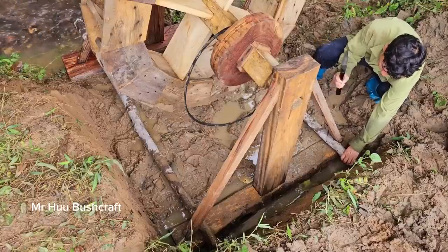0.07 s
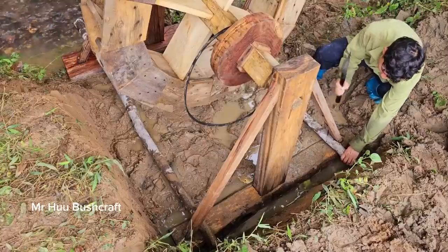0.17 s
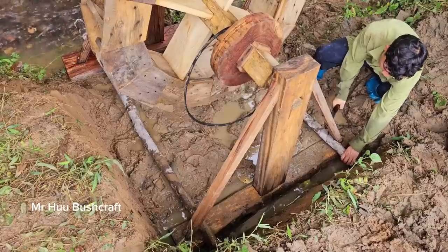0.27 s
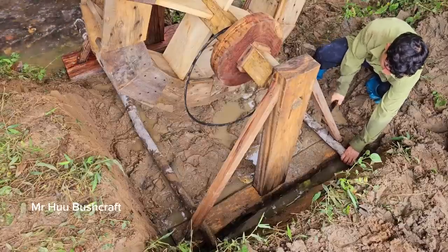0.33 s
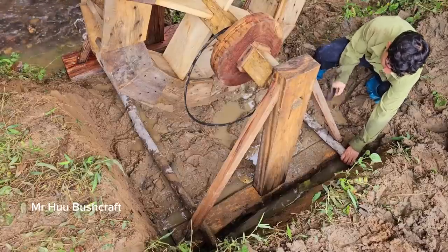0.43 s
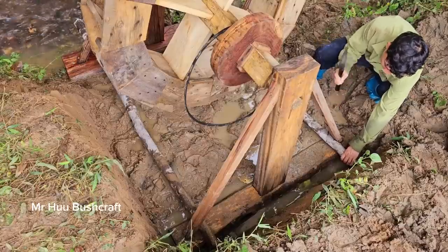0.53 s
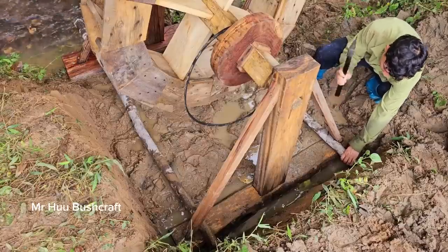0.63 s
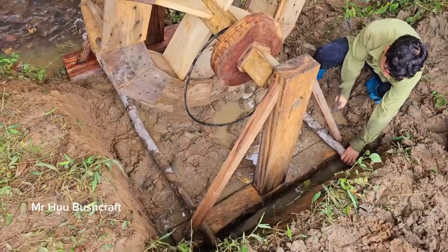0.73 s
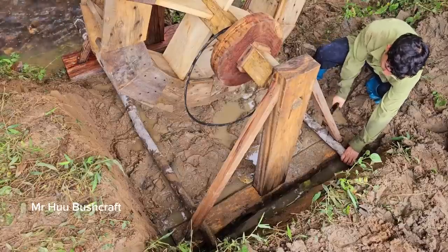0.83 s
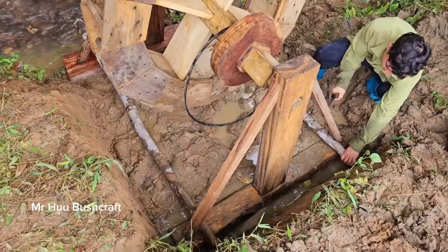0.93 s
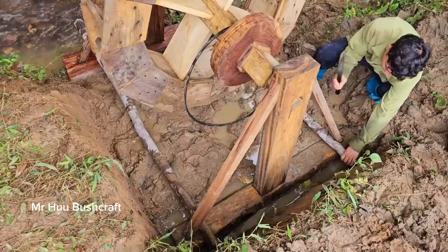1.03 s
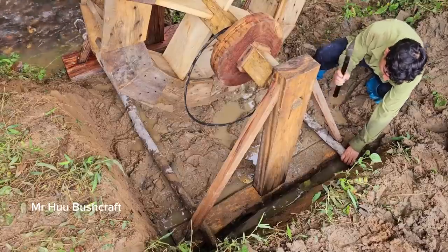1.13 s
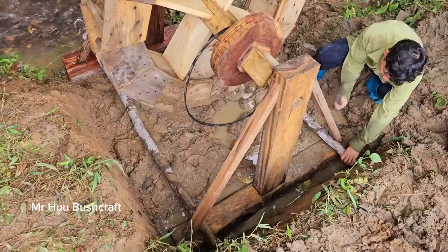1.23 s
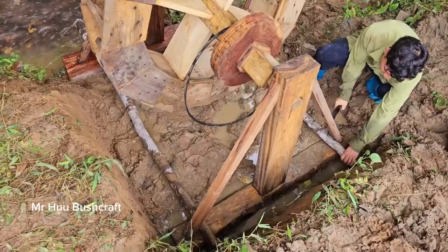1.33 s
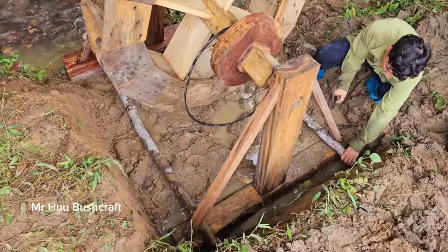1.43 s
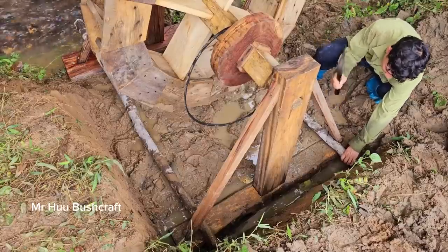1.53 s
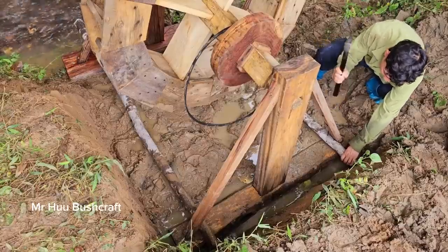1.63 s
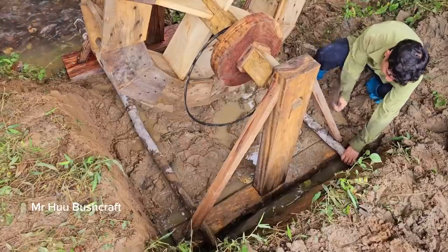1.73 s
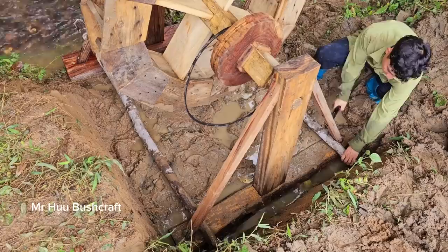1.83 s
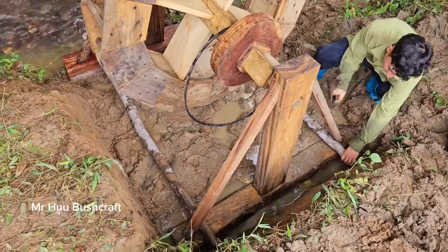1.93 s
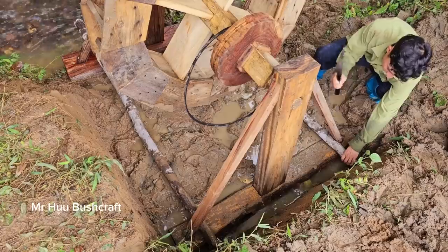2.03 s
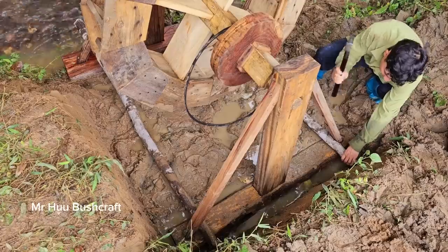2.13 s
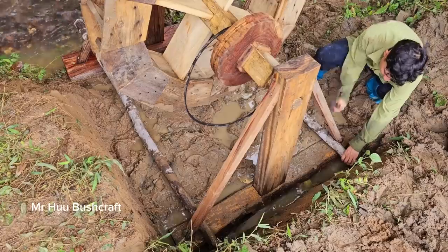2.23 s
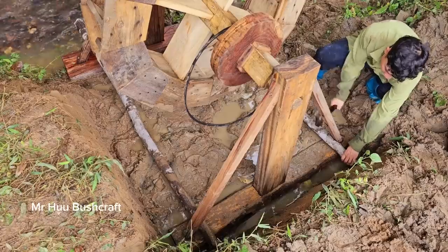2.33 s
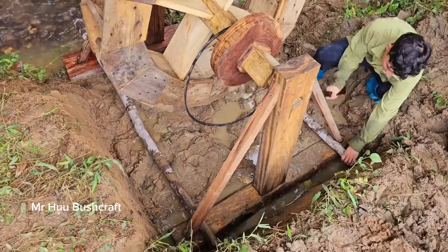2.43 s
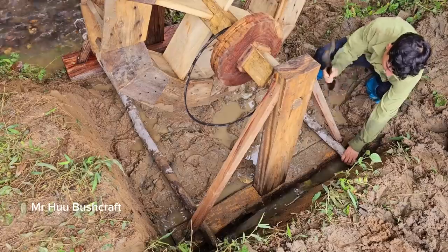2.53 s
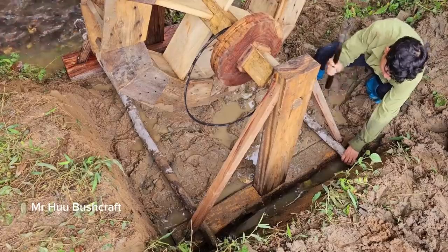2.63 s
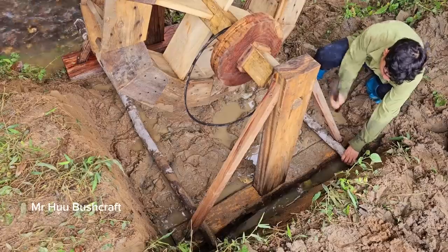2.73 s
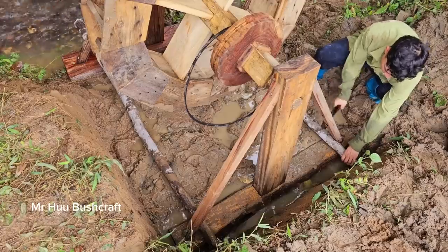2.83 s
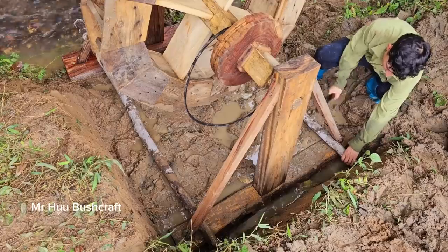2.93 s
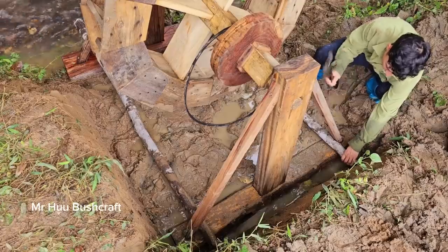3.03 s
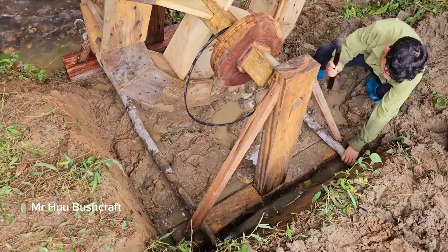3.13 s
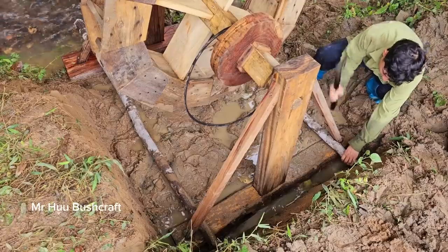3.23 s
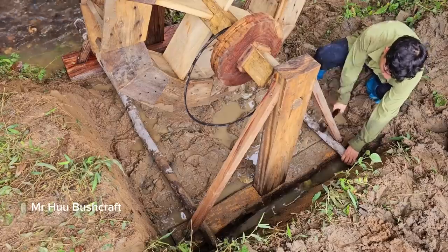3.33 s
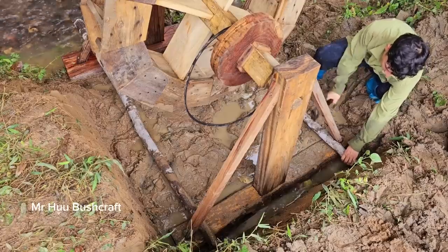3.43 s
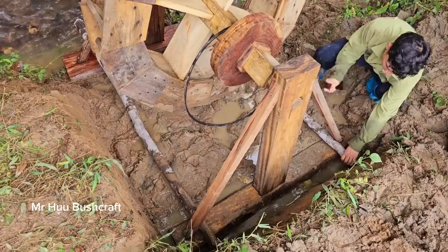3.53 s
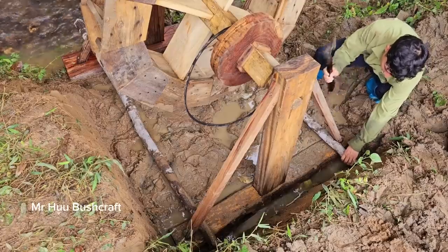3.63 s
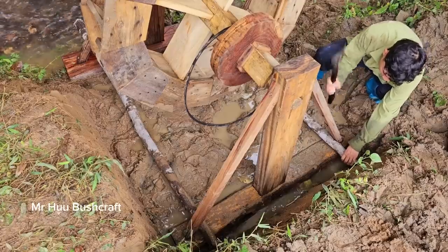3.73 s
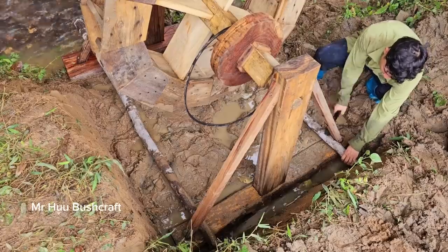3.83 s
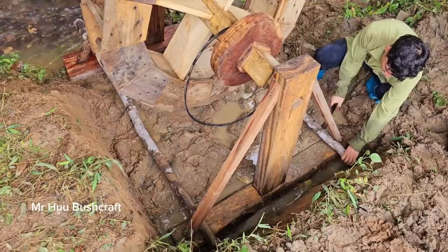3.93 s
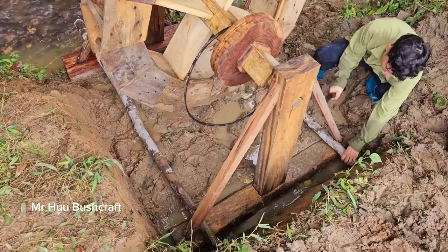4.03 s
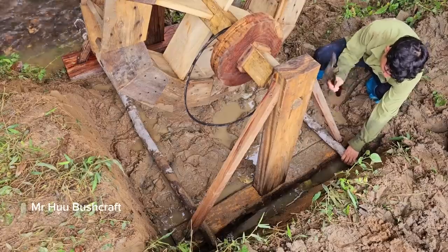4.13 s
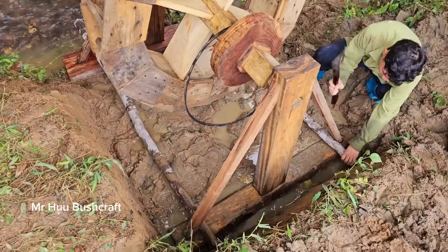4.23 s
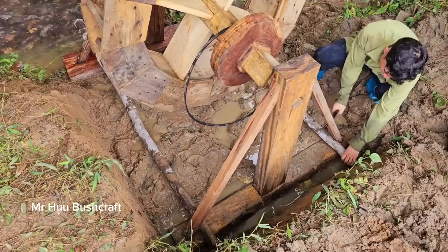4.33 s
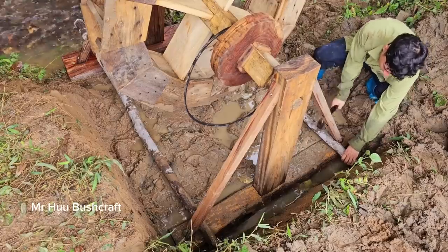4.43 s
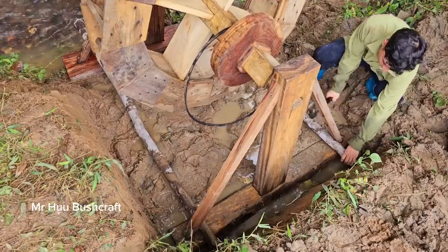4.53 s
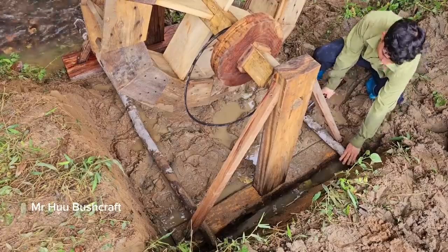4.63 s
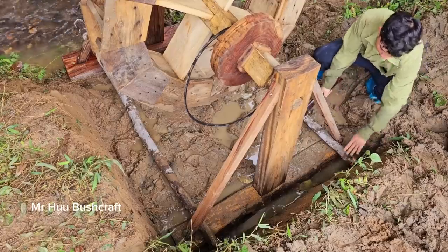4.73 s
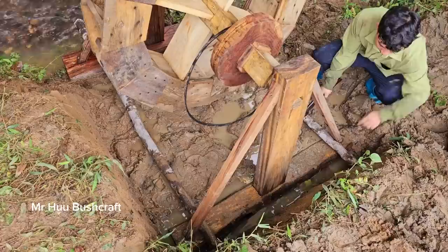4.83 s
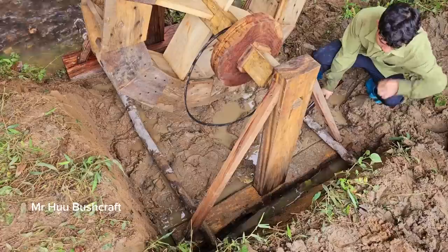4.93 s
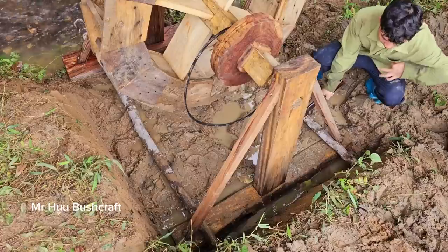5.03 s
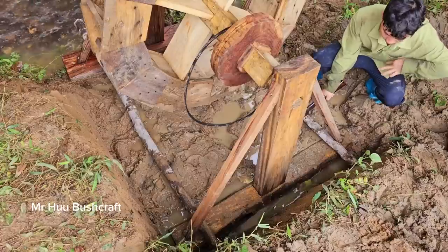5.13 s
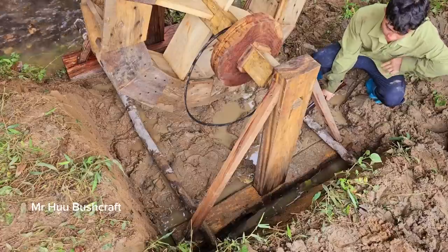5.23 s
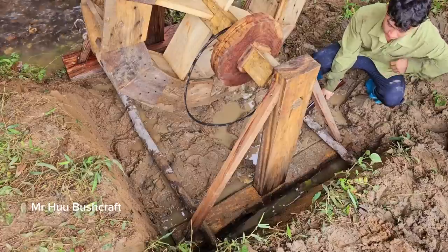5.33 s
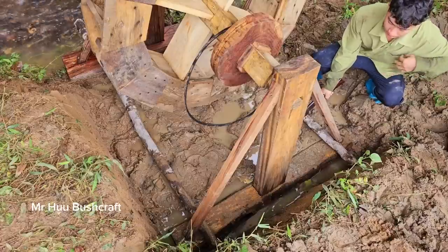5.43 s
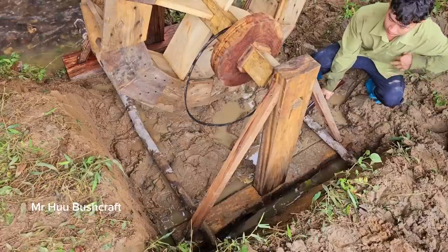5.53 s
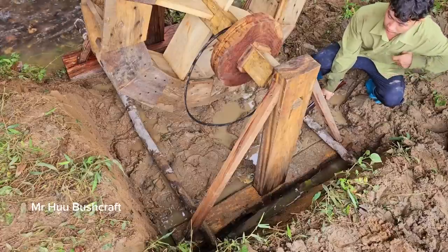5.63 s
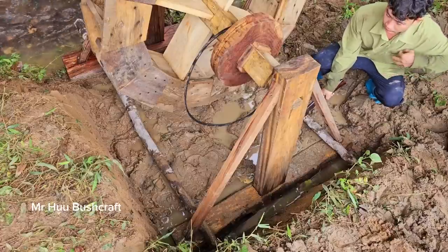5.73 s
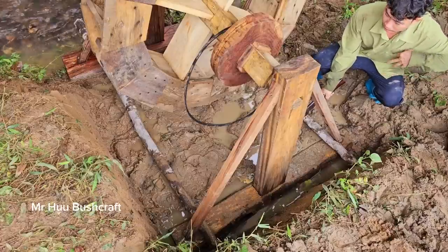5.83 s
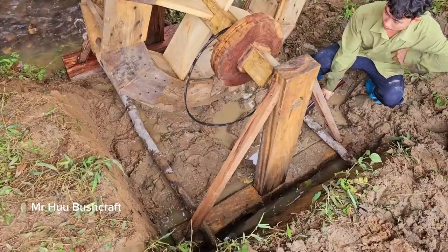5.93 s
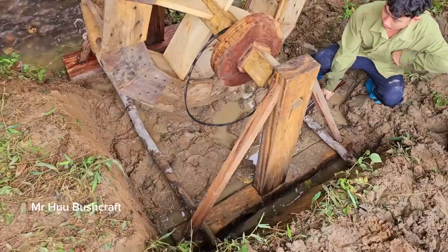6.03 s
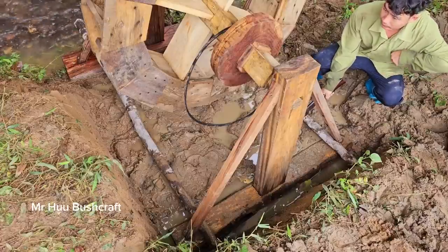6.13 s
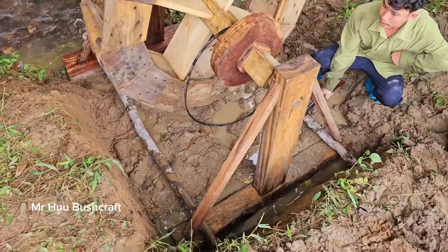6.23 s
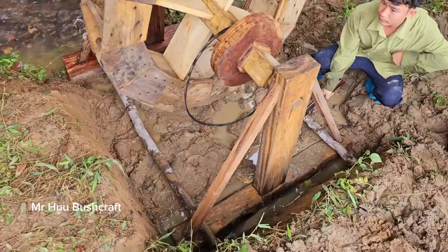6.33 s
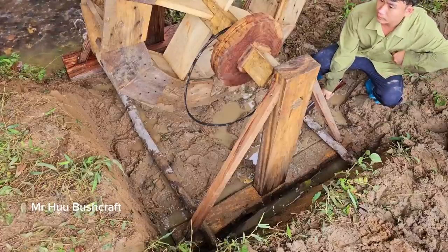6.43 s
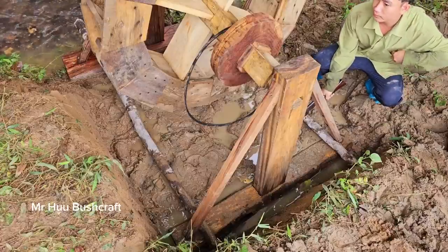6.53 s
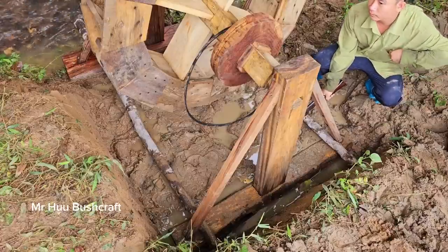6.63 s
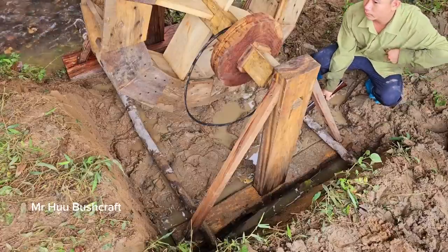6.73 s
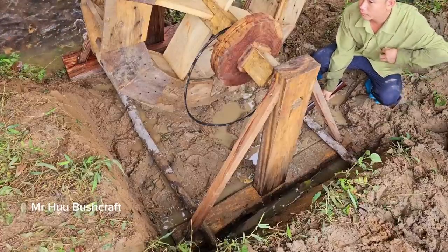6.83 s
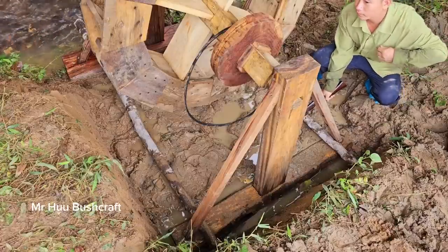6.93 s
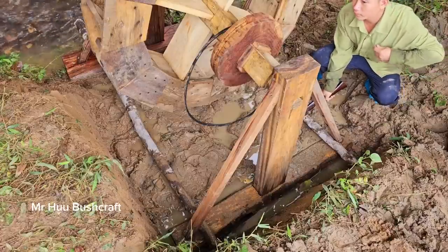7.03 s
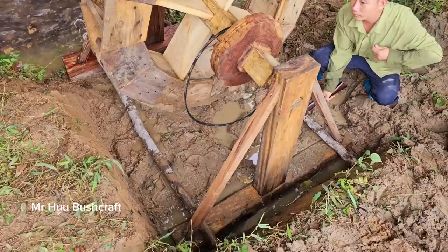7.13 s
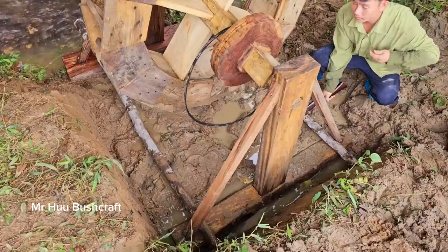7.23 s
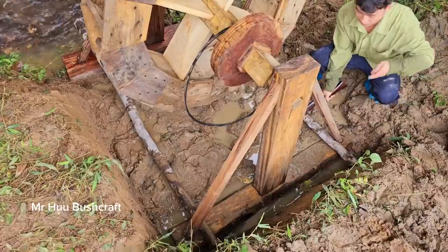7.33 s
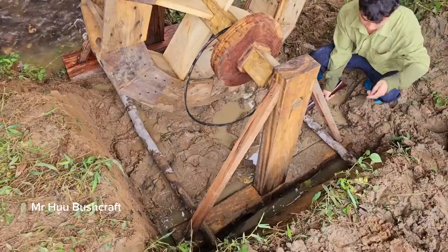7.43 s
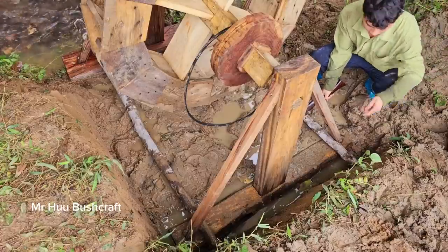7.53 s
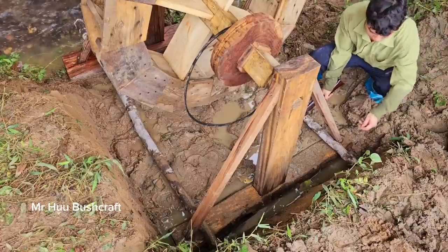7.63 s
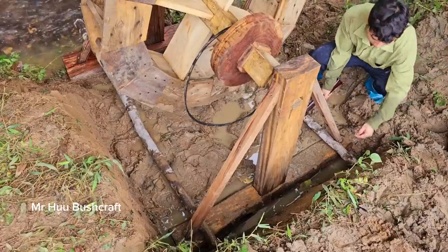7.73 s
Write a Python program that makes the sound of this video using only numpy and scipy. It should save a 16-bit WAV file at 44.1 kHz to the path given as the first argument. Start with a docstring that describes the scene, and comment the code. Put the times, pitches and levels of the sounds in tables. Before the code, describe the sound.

Loud, dry chopping blows dominate the first four seconds, steady and close, growing slightly duller and less boomy. After the last blow comes one dull, rounded bump. Then only the far quieter bed remains: stream hiss with small gurgles, a thin high insect shrill, falling bird trills and a very low distant drone that swells once. Open air, close stereo microphone.

```python
"""From the start a small stream hisses and gurgles (coloured noise, gliding bubble tones) over a low noise drone.
Insects shrill beside it: one narrow band of noise. Nine times a hand tool is driven into muddy ground at the foot
of a timber frame: each blow is a noise crack, ringing wood and steel modes, a jolt of the frame and a diffuse tail.
During the last blows a bird starts trilling in quick falling notes; then the tool is set down with a dull bump.
The level of water and insects dips as the work ends, then rises; the drone swells once. Two close ports hear it."""
import sys
import numpy as np
from scipy import signal
from scipy.fft import rfft, irfft
from scipy.io import wavfile
from scipy.ndimage import uniform_filter1d

SR = 44100
rng = np.random.default_rng(int(sys.argv[2]) if len(sys.argv) > 2 else 0)


def output_pcm(signal):
    """Save a mono or channel-first signal as 16-bit PCM at the path in sys.argv[1].

    Samples are clipped to [-1, 1] before scaling.
    """
    pcm = np.clip(np.atleast_2d(signal).T, -1, 1) * 32767
    wavfile.write(sys.argv[1], SR, np.round(pcm).astype(np.int16))


N = 342657

# Strokes of the tool: (time [s], force [dB], wood [dB], hollow note [Hz], hard knock [Hz],
# scrape [Hz], scrape [dB], steel [dB])
STROKES = [(0.1573, -0.5, 5.5, 694, 1327, 5950, -0.5, -6), (0.6654, 0, 0.5, 973, 1436, 6820, 3, -17),
           (1.1742, 0, 2, 775, 1430, 7510, 6.5, -12), (1.6726, 0, 1, 770, 1313, 7900, 10, -6),
           (2.169, 0, 1.5, 657, 1530, 4460, 7, 4), (2.6833, 0, 0, 716, 1263, 5400, 2.5, -3.5),
           (3.2074, 0.5, 0, 702, 1270, 5300, -2.5, -2.5), (3.7320, 1, 4.5, 688, 1330, 5380, 0.5, -9),
           (4.2525, 1, 6, 483, 1302, 5330, 5.5, -0.5)]
# Modes of the struck wood: (frequency [Hz], level [dB], 60 dB decay [s])
WOOD_MODES = [(361, -16, .07), (486.5, -17.5, 0.13), (616.4, -15.5, .09), (704, -12.5, 0.087),
              (778, -20.5, 0.069), (971, -15.5, 0.05), (1056, -10.5, 0.089), (1125, -14.5, 0.057),
              (1248.5, -9, 0.079), (1312, -11, 0.073), (1426, -7.5, .05), (1576, -7, .05),
              (1626, -7, 0.025), (1961, -6.5, 0.037), (2286, 2, .04), (2594, -9, 0.064), (2720, -24.5, .06),
              (3250, -17.5, 0.051)]
# Modes of the tool's steel: (frequency [Hz], level [dB], 60 dB decay [s])
STEEL_MODES = [(4255, -4, .19), (4408, -2, .2), (5190, -8, .2), (6285, 0, .27), (7325, -6, .17),
               (9150, -11, .16)]
# Modes of the frame on its bed of mud: (frequency [Hz], level [dB], 60 dB decay [s])
FRAME_MODES = [(54.5, -13.5, 0.77), (88.8, -3, 0.48), (113, -11.5, 0.62), (155.7, -5.5, 0.34),
               (245.2, -1, 0.29), (306, -4, .22)]
# Jolts of the loose timbers after a blow: (delay [s], level [dB], push width [s])
TIMBER_JOLTS = [(.0022, -1.5, 0.00073), (0.014, -7.5, .0014), (0.023, -3, .0022), (.0353, -5.5, 0.0013)]
# Colour of the contact crack: (frequency [Hz], level [dB per Hz])
CRACK_COLOUR = [(300, -10.5), (900, -3.5), (1600, 4), (2500, 2), (3500, -5), (5500, 2.5), (8000, -3.5),
                (12000, -3), (16000, -0.5)]
# Colour of the diffuse tail after a blow: (frequency [Hz], level [dB per Hz])
TAIL_COLOUR = [(25, -8), (45, -4), (100, 3), (250, 6.5), (400, 1), (700, -3), (1300, -0.5), (1900, -6.5),
               (3000, -1), (5200, -2.5), (8000, -3.5), (11000, -2.5), (16000, -5.5)]
# Decay of the diffuse tails: (frequency [Hz], 60 dB decay [s])
TAIL_DECAY = [(50, 0.29), (150, 0.29), (500, 0.2), (1500, 0.2), (4000, 0.25), (15000, 0.22)]
# Colour of the scatter as the tool is laid down: (frequency [Hz], level [dB per Hz])
SET_DOWN_COLOUR = [(25, -21), (70, -3), (150, -7), (340, -2), (450, -11), (620, -11), (850, -33),
                   (1100, -20), (1700, -35), (3000, -45), (8000, -60)]
# Modes of the bump as the tool is laid down: (frequency [Hz], level [dB], 60 dB decay [s])
BUMP_MODES = [(150.2, -4, 0.23), (241.5, -9, 0.11), (336, -1, 0.18), (512, -11, 0.11), (594, -8, 0.087),
              (683, -2.5, 0.068), (1036, -8, 0.058), (1640, -18, .05)]
# Colour of the broad stream hiss: (frequency [Hz], level [dB per Hz])
WATER_COLOUR = [(30, -24), (230, -24), (340, -11.5), (550, -2.5), (800, 0.5), (1300, -1), (2300, -5.5),
                (3600, -6.5), (5300, -2), (6000, -8.5), (7500, -2), (8600, -5), (9700, -13), (16000, -13.5)]
# Colour of the sizzle of one riffle: (frequency [Hz], level [dB per Hz])
RIFFLE_COLOUR = [(2500, -6), (4400, -1.5), (5300, -2.5), (6000, -13), (7000, 0), (7600, -4.5), (8600, -7.5),
                 (9800, -22.5)]
# The loudest gurgles: (time [s], starting pitch [Hz], level [dB])
LOUD_GURGLES = [(.093, 520, -48), (0.422, 923, -40), (.8, 577, -47.5), (.89, 435, -48), (2.455, 953, -45.5),
                (2.635, 760, -45.5), (5.34, 396, -54.5), (6.04, 559, -52), (6.41, 664, -50.5),
                (7.5, 502, -48)]
# Level of the water and insects: (time [s], level [dB])
BACKGROUND_LEVEL = [(0, -59), (4.3, -59.5), (5, -62.5), (7.77, -56.5)]
# Colour of the insects: (frequency [Hz], level [dB per Hz])
INSECT_COLOUR = [(5500, -60), (6450, -16), (6720, 0), (6950, -14), (7500, -16), (8300, -50)]
# Bird trills: (time [s], length [s], pitch [Hz], level [dB])
BIRD_TRILLS = [(3.361, 0.19, 4330, -63), (3.379, 0.37, 3310, -64.5), (5.08, 0.43, 3284, -65),
               (5.844, 0.23, 4290, -60), (7.062, 0.44, 3300, -60)]
# Colour of the drone: (frequency [Hz], level [dB per Hz])
DRONE_COLOUR = [(25, -27), (60, -20), (80, -11), (94, -1), (110, -9.5), (135, -27.0), (300, -47.0), (2000, -86)]

TIME = np.arange(N) / SR
AGE = TIME[:SR // 2]  # time since a contact; each struck sound stops at half a second
PORT_LAG_S, TOP_HZ = 4.5 / SR, 15900

# The parts of a stroke (dB)
CRACK_DB, SECOND_GRIT_DB, WOOD_DB, REBOUND_DB = -11, -.5, -17, -20.5
SCRAPE_DB, STEEL_DB, TAIL_DB = -38, -35, -18.5
BITE_RISE_S, BITE_S, REBOUND_S = 0.00074, .0033, .009  # the edge enters, bites, and lands again
HOLLOW_DB, KNOCK_DB = 7, 7.5  # lift of the wood modes around each stroke's hollow note and hard knock
# The mud packs as the work goes on: strokes grow duller, thud less and lose their deep bass
BRIGHT_DB_PER_OCT, DULLING_DB_PER_OCT_S = 0.35, 0.82
THUD_DB, THUD_LOSS_DB_PER_S = 1.5, .5
BASS_CUT_HZ, BASS_CUT_HZ_PER_S = 9, 15
SET_DOWN_S = 4.583

RIFFLE_LAG_SAMPLES = 16
PLOP_CYCLES = 20  # length of the large bubbles; each sounds for twice this many starting periods
GURGLE_HZ, GURGLE_OCTAVES, GURGLE_DB = 397, 1.3, 1.5  # large random bubbles: lowest pitch, range, mean level
INSECT_DB = -11  # relative to the background level
DRONE_DB, DRONE_SINK_DB_PER_S = -66.5, .7
SWELL_S, SWELL_WIDTH_S, SWELL_DB = 6.44, 0.32, 6.5  # the drone swells once


def blows():
    """Contact crack, knock of wood, scrape and ring of steel, thud and tail for every stroke."""
    out = np.zeros((2, N))
    for s, force_db, wood_db, hollow_hz, knock_hz, scrape_hz, scrape_db, steel_db in STROKES:
        force = undb(force_db)
        tilt_db = BRIGHT_DB_PER_OCT - DULLING_DB_PER_OCT_S * s
        add(out, s, force * undb(CRACK_DB) * crack(tilt_db))

        modes = wood_modes(hollow_hz, knock_hz)
        knock = pressed(ring(modes, scatter_db=4, detune=0.0029))
        add(out, s, force * undb(wood_db + WOOD_DB) * from_right(knock))
        # the tool lands a second time, softer and duller
        duller = [(hz, db - hz / 300, t60) for hz, db, t60 in modes]
        rebound = pressed(ring(duller, scatter_db=5, detune=.015))
        add(out, s + REBOUND_S, force * undb(wood_db + REBOUND_DB) * from_right(rebound))

        # each port draws its own modes; ten crowd around the scrape's pitch
        scrape = np.array([ring([(scrape_hz, 0, .14)] * 10, scatter_db=5, detune=.035) for _ in out])
        steel = np.array([ring(STEEL_MODES, scatter_db=1.5, detune=.0005) for _ in out])
        metal = undb(scrape_db + SCRAPE_DB) * scrape + undb(steel_db + STEEL_DB) * steel
        add(out, s, force * metal)

        boom = undb(THUD_DB - THUD_LOSS_DB_PER_S * s) * thud(push_db=-16.0, frame_db=-31, low_hz=34.5)
        boom = boom + undb(TAIL_DB) * tail(TAIL_COLOUR, tilt_db, build_s=.005, alike_hz=800)
        packed = signal.butter(1, BASS_CUT_HZ + BASS_CUT_HZ_PER_S * s, "high", fs=SR, output="sos")
        add(out, s, force * signal.sosfilt(packed, boom))
    return out


def crack(tilt_db):
    """Grit cracks while the edge bites: two layers of noise, the first reaching the right port earlier."""
    grit = noise(CRACK_COLOUR, len(AGE), alike_hz=1960, tilt_db=tilt_db)
    bite = (1 - np.exp(-AGE / BITE_RISE_S)) / (1 + (AGE / BITE_S) ** 3)
    first_grit = from_right(grit[0])
    second_grit = undb(SECOND_GRIT_DB) * grit[:, ::-1]  # the noise run backwards
    return (first_grit + second_grit) * bite


def wood_modes(hollow_hz, knock_hz):
    """Which wood modes answer best depends on where the tool lands."""
    return [(hz, db + HOLLOW_DB * near(hz, hollow_hz) + KNOCK_DB * near(hz, knock_hz, width=0.085), t60)
            for hz, db, t60 in WOOD_MODES]


def near(hz, centre_hz, width=0.24):
    """One at the centre frequency, falling away on both sides; width in natural-log frequency."""
    return np.exp(-(np.log(hz / centre_hz) / width) ** 2)


def pressed(x, rise=0.038, contact_s=0.0032):
    """Wood under load starts softly and a little sharp, then relaxes to its own pitch."""
    warped = AGE + rise * contact_s * (1 - np.exp(-AGE / contact_s))
    return np.interp(warped, AGE, x) * (1 - np.exp(-AGE / 0.0024))


def thud(push_db, frame_db, low_hz):
    """Soft pushes of the jolting timbers, and the low ring of the frame."""
    pushes = sum(undb(db) * np.exp(-.5 * ((AGE - s) / width) ** 2) for s, db, width in TIMBER_JOLTS)
    pushes = signal.sosfilt(signal.butter(2, low_hz, "high", fs=SR, output="sos"), pushes)
    frame = ring(FRAME_MODES, scatter_db=1, detune=.003)
    return undb(push_db) * pushes - undb(frame_db) * frame


def tail(colour, tilt_db, build_s, alike_hz):
    """Dense scatter from timber and banks: it builds up, then each octave dies at its own pace."""
    hz = np.fft.rfftfreq(len(AGE), 1 / SR)
    spectrum = rfft(noise(colour, len(AGE), alike_hz, tilt_db)) * imprint(hz)
    octave = np.log2(np.clip(hz, 2 ** 5, 2 ** 14))
    total = 0
    for k in range(5, 15):
        overlap = np.maximum(1 - abs(octave - k), 0)  # neighbouring octaves crossfade
        total = total + irfft(spectrum * overlap, len(AGE)) * fade(read(TAIL_DECAY, 2. ** k))
    return total * (1 - np.exp(-AGE / build_s))


def imprint(hz, ripple_db=4.5, ripple_hz=60):
    """Every rough contact leaves its own fine peaks and dips in its tail, stronger toward the treble."""
    ripple = np.interp(hz / ripple_hz, np.arange(len(hz)), rng.standard_normal(len(hz)))
    return undb(ripple_db * ripple * hz / (hz + 400))


def set_down(soft_hz=2000):
    """The tool is laid down with one dull, rounded bump: ringing modes and a short scatter."""
    out = np.zeros((2, N))
    body = from_right(ring(BUMP_MODES, scatter_db=0, detune=0)) * (1 - np.exp(-AGE / 0.0019))
    scatter = tail(SET_DOWN_COLOUR, 0, build_s=0.0033, alike_hz=1490)
    bump = undb(-33.5) * scatter + undb(-28.5) * body
    add(out, SET_DOWN_S, signal.sosfilt(signal.butter(4, soft_hz, fs=SR, output="sos"), bump))
    return out


def stream():
    """Flickering hiss, a riffle and bubbles follow the background level; a few louder gurgles stand apart."""
    # the riffle lies to the left and reaches that port first
    riffle = noise(RIFFLE_COLOUR, N, alike_hz=100)[0]
    riffle = undb(-9.0) * np.array([riffle, np.roll(riffle, RIFFLE_LAG_SAMPLES)])
    hiss = (undb(-0.5) * noise(WATER_COLOUR, N, alike_hz=583) + riffle) * undb(1.1 * walk(21))
    water = hiss + bubble_crowd() + gurgles()
    left_right_db = np.array([[1], [-1]])
    return water * undb(background_db() + left_right_db) + loud_gurgles()


def bubble_crowd(count=1000):
    """Small bubbles scattered over time and between the ports."""
    out = np.zeros((2, N))
    for when, pitch, size, length, pan in rng.random((count, 5)):
        hz = 420 * 2 ** (2.6 * pitch ** .8)
        # most bubbles are faint, a few stand out; higher ones are quieter
        db = -4 * np.log(max(1 - size, .06)) - 2 * pitch - 2
        ports = [np.sqrt(1 - pan), np.sqrt(pan)]
        add(out, when * TIME[-1], undb(db) * np.outer(ports, bubble(hz, 10 + 20 * length)))
    return out


def gurgles(count=48):
    """Large bubbles that break at random among the stones."""
    out = np.zeros((2, N))
    for when, pitch, size in rng.random((count, 3)):
        hz = GURGLE_HZ * 2 ** (GURGLE_OCTAVES * pitch)
        add(out, when * TIME[-1], undb(GURGLE_DB + 6 * (size - .5)) * bubble(hz, PLOP_CYCLES))
    return out


def loud_gurgles():
    """The loudest large bubbles, at set times and pitches."""
    out = np.zeros((2, N))
    for s, hz, db in LOUD_GURGLES:
        add(out, s, undb(db) * bubble(hz, PLOP_CYCLES))
    return out


def bubble(hz, cycles, glide=0.16):
    """A trapped air pocket rings and rises in pitch as it nears the surface."""
    life = np.arange(int(2 * cycles / hz * SR)) * hz / (cycles * SR)  # runs from 0 to 2
    level = np.exp(-2.6 * life) * (1 - np.exp(-14 * life))
    return level * np.sin(2 * np.pi * cycles * (life + glide * life ** 2 / 2))


def background_db():
    """The level of water and insects dips as the work ends, then rises."""
    return np.interp(TIME, *np.transpose(BACKGROUND_LEVEL))


def insects():
    """A thin, slightly flickering shrill from the grass straight ahead: narrow noise."""
    return noise(INSECT_COLOUR, N, alike_hz=14000) * undb(background_db() + INSECT_DB + walk(8.5))


def bird(rate=27, fall=.13):
    """Trills of quick falling notes that swell and rise toward the middle, blurred by the trees."""
    out = np.zeros((2, N))
    for s, length, hz, db in BIRD_TRILLS:
        t = np.arange(int(length * SR)) / SR
        note = t * rate % 1  # progress through each note, rate in notes per second
        arch = np.sin(np.pi * t / length)
        pitch = hz * (1 + fall * (.5 - note) + .02 * (arch - .5))
        level = undb(db) * np.sqrt(arch * np.sin(np.pi * note))
        song = level * np.sin(2 * np.pi * np.cumsum(pitch) / SR)
        trees = rng.standard_normal((2, len(AGE))) * fade(.25)
        add(out, s, song)
        add(out, s, .5 * signal.fftconvolve(song[None], trees / np.linalg.norm(trees[0])))
    return out


def drone():
    """A far, narrow rumble of noise that slowly sinks and swells once."""
    swell = np.exp(-((TIME - SWELL_S) / SWELL_WIDTH_S) ** 2)
    level_db = DRONE_DB - DRONE_SINK_DB_PER_S * TIME + SWELL_DB * swell
    return noise(DRONE_COLOUR, N, alike_hz=400) * undb(level_db)


def undb(db):
    """Decibels to gain."""
    return 10 ** (np.asarray(db) / 20)


def read(table, hz):
    """Value of a (frequency [Hz], value) table on a log-frequency axis."""
    f, value = np.transpose(table)
    return np.interp(np.log(hz + 1e-3), np.log(f), value)


def fade(t60):
    """Exponential decay that loses 60 dB in t60 seconds."""
    return np.exp(-np.log(1000) * AGE / t60)


def add(out, s, sound):
    """Mix a sound into both channels at time s."""
    i = max(int(s * SR), 0)
    part = sound[..., :max(N - i, 0)]
    out[:, i:i + part.shape[-1]] += part


def noise(colour, size, alike_hz, tilt_db=0):
    """Unit stereo noise of a given colour; the ports hear nearly the same below alike_hz."""
    hz = np.fft.rfftfreq(size, 1 / SR)
    mid, side = rfft(rng.standard_normal((2, size)))
    alike = .92 / (1 + (hz / alike_hz) ** 4)
    pair = np.sqrt(1 + alike) * mid + np.sqrt(1 - alike) * np.array([side, -side])
    # the tilt is in dB per octave above 2500 Hz
    colour_db = read(colour, hz) + tilt_db * np.log2(np.maximum(hz / 2500, 1))
    x = irfft(pair * undb(colour_db), size)
    return x / x.std()


def ring(modes, scatter_db, detune):
    """Decaying modes, a quarter turn apart, with random shifts of level and pitch."""
    chance = rng.standard_normal((len(modes), 2))
    total = 0
    for k, ((hz, db, t60), (louder, sharper)) in enumerate(zip(modes, chance)):
        phase = 2 * np.pi * hz * (1 + detune * sharper) * AGE - k * np.pi / 2
        total = total + undb(db + scatter_db * louder) * fade(t60) * np.sin(phase)
    return total


def from_right(x):
    """The sound reaches the left port slightly later."""
    return np.array([np.interp(AGE - PORT_LAG_S, AGE, x, left=0), x])


def walk(rate):
    """Slow random wander with a spread near 1; rate in new values per second."""
    k = int(SR / rate)
    steps = np.repeat(rng.standard_normal(N // k + 1), k)
    return 1.3 * uniform_filter1d(uniform_filter1d(steps, k), k)[:N]


def scene():
    """Work in the foreground; water, insects, a bird and a drone behind."""
    return blows() + set_down() + stream() + insects() + bird() + drone()


def record(dry):
    """Peaks beyond 0.9 overload, and the top is cut."""
    return signal.sosfilt(signal.ellip(8, .2, 70, TOP_HZ, fs=SR, output="sos"), np.clip(dry, -.9, .9))


dry = scene()
out = record(dry)
output_pcm(out)
```